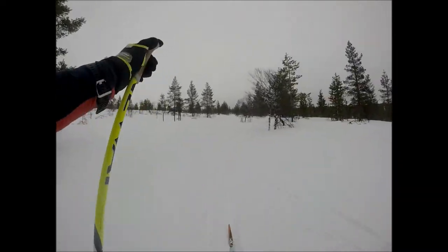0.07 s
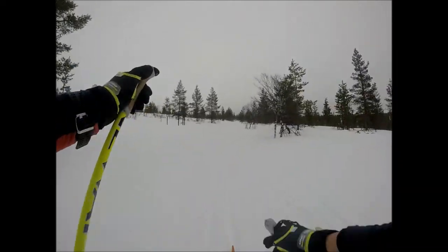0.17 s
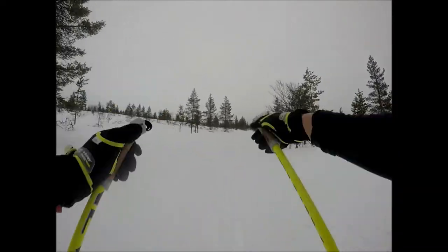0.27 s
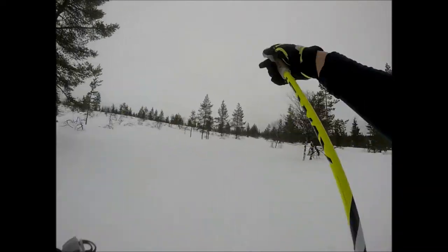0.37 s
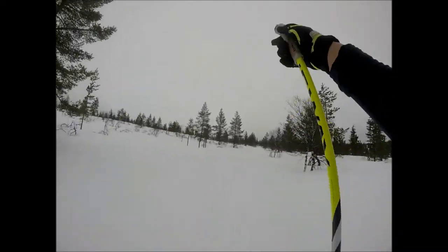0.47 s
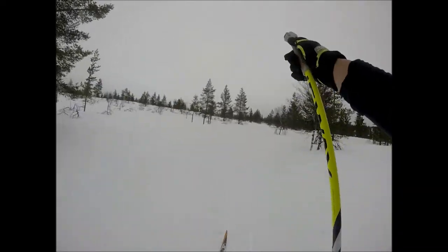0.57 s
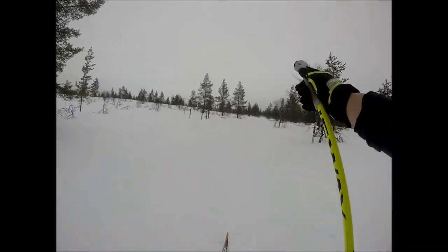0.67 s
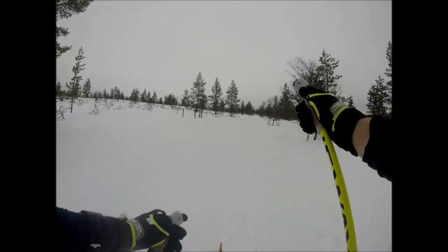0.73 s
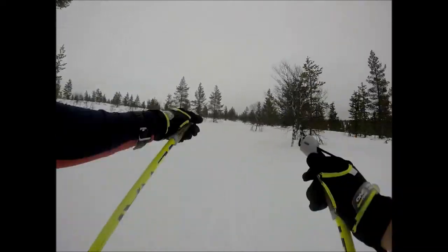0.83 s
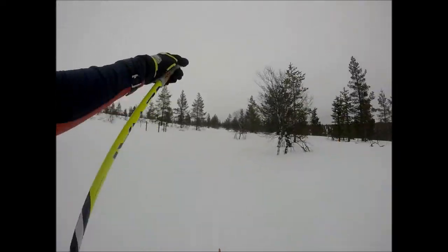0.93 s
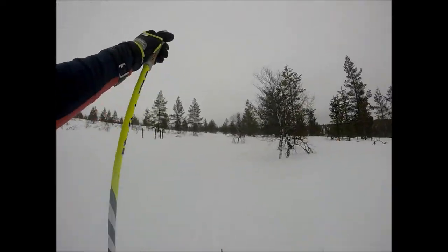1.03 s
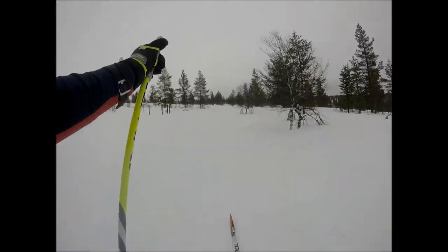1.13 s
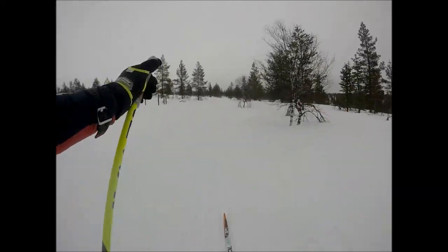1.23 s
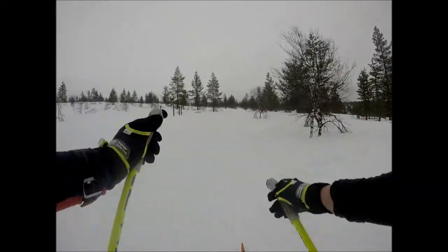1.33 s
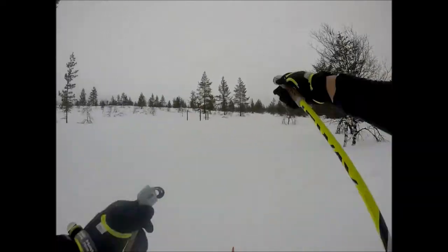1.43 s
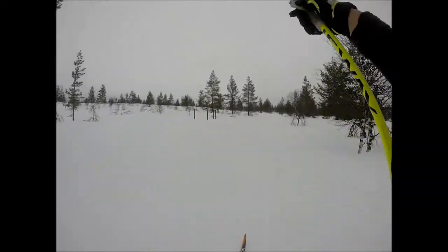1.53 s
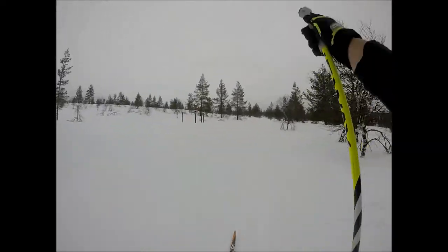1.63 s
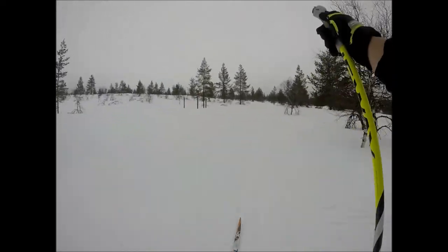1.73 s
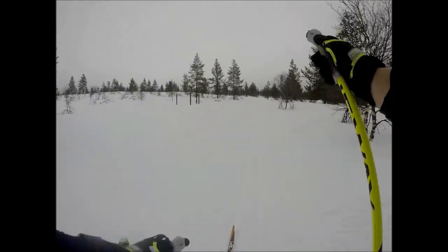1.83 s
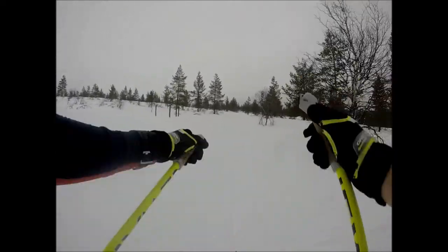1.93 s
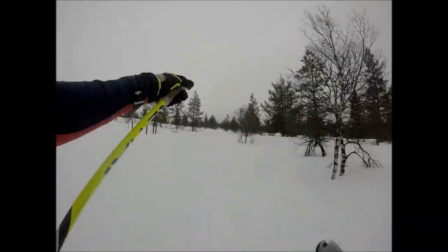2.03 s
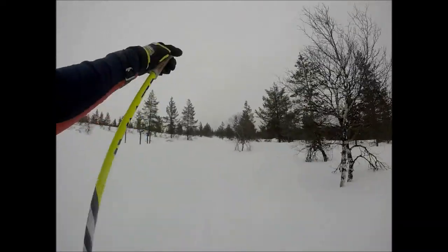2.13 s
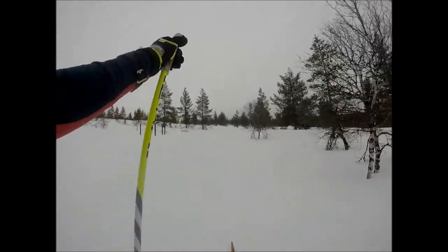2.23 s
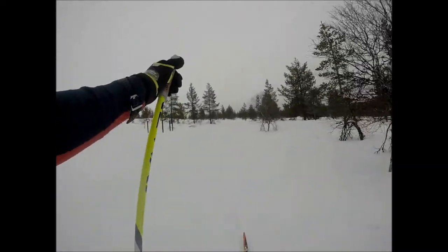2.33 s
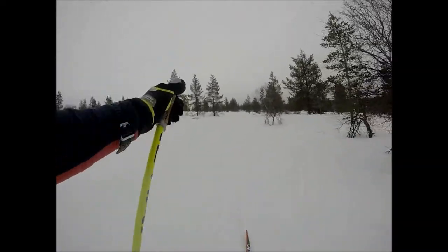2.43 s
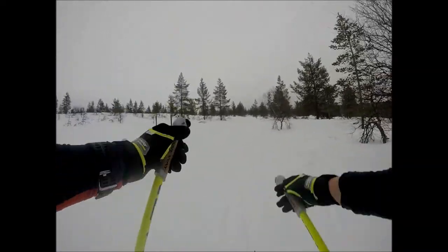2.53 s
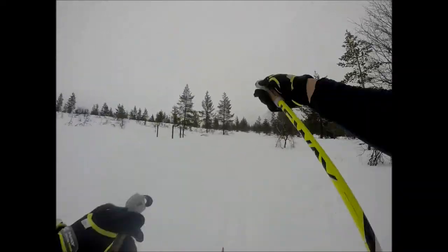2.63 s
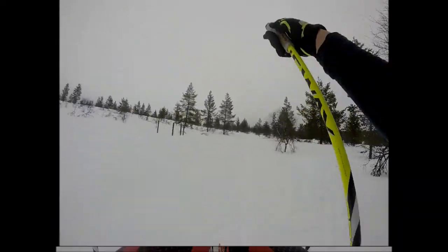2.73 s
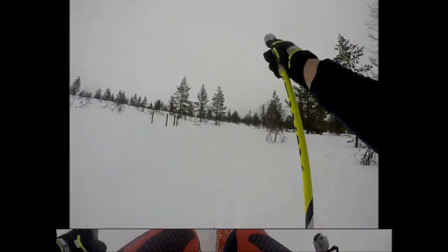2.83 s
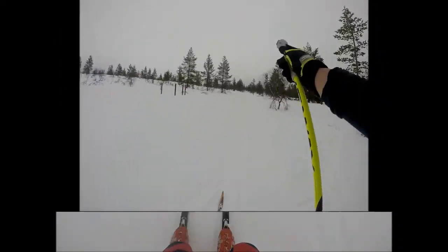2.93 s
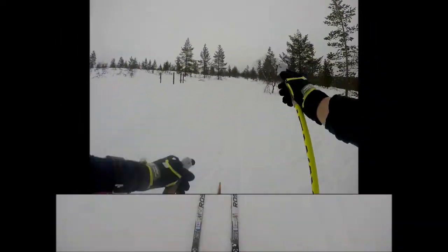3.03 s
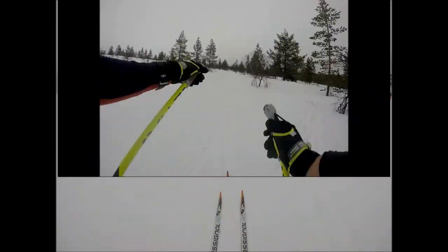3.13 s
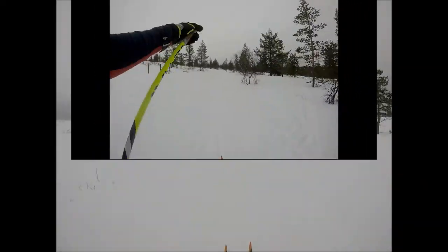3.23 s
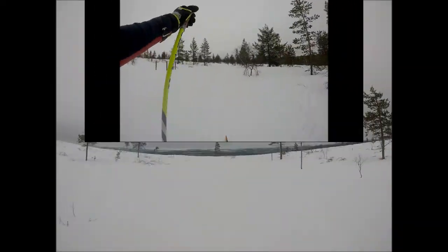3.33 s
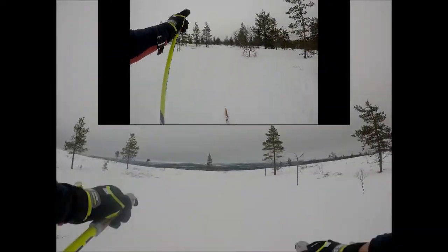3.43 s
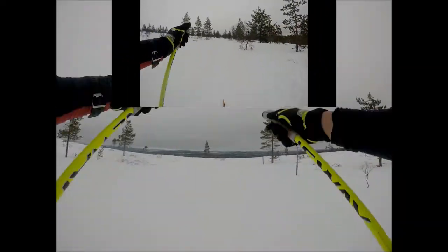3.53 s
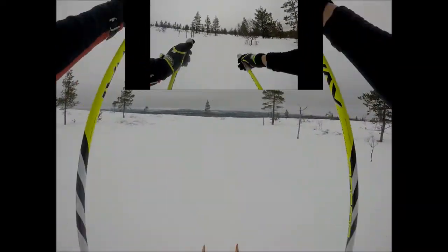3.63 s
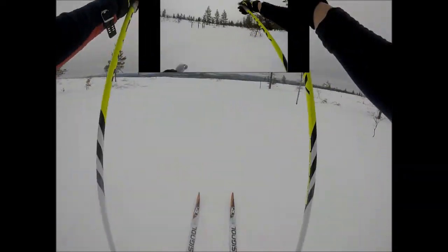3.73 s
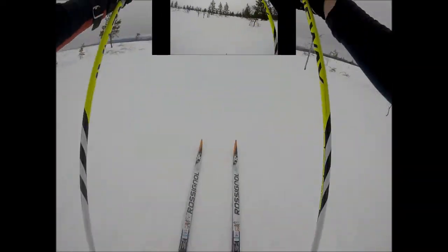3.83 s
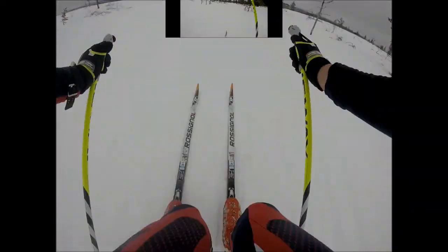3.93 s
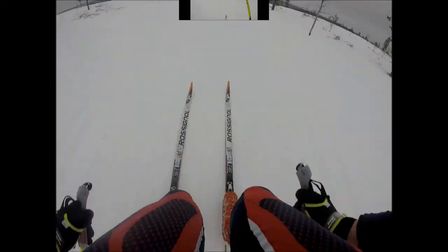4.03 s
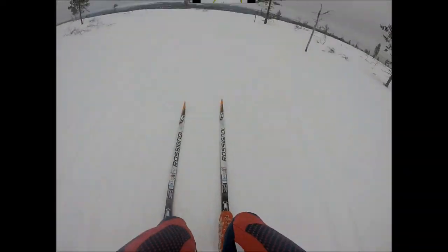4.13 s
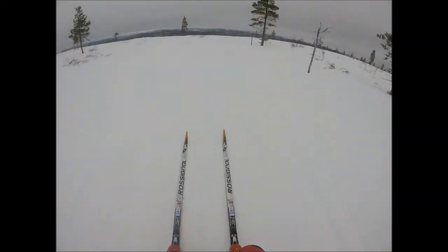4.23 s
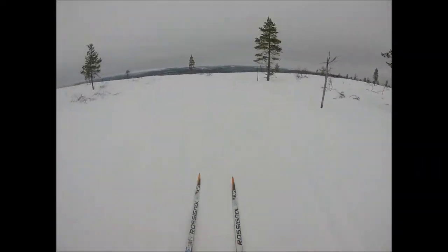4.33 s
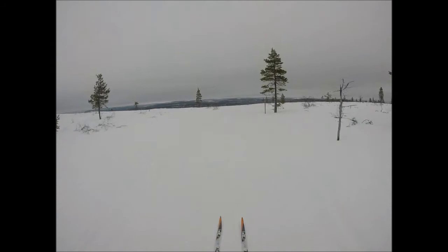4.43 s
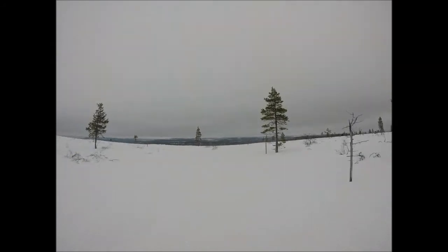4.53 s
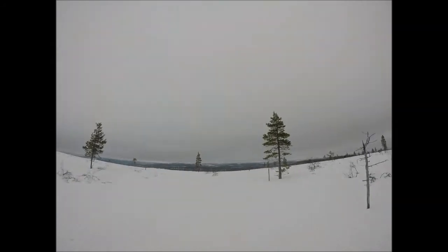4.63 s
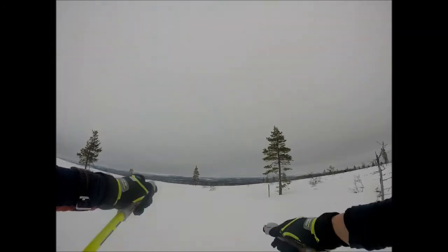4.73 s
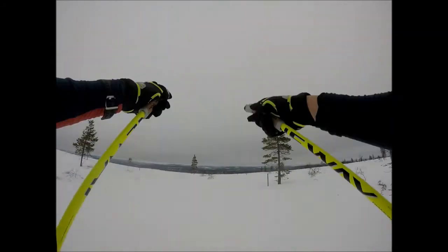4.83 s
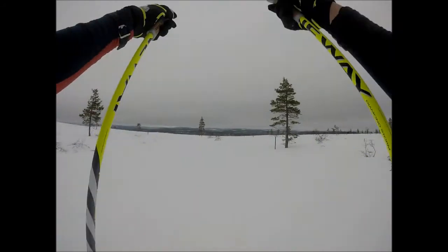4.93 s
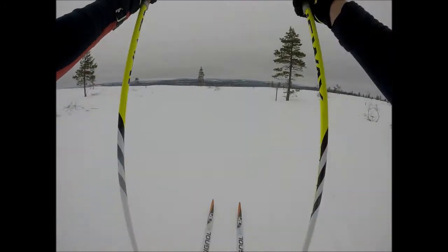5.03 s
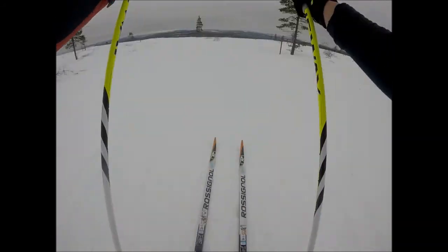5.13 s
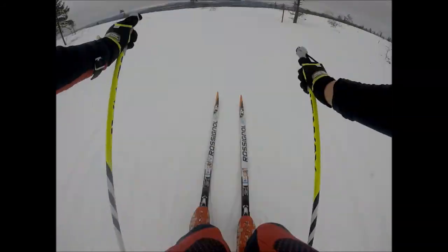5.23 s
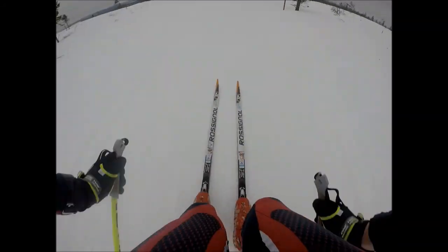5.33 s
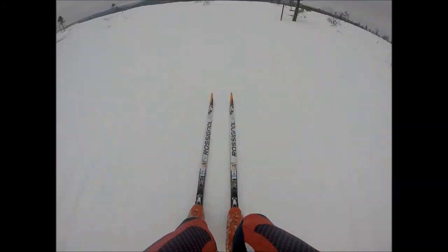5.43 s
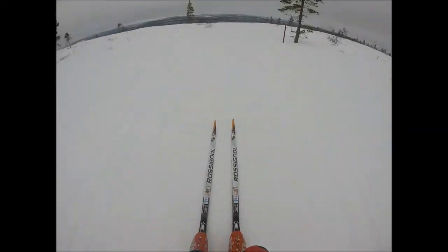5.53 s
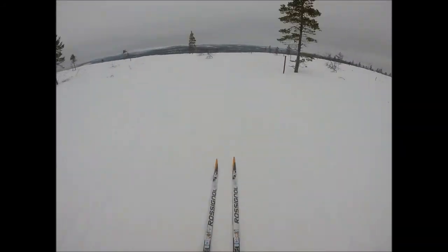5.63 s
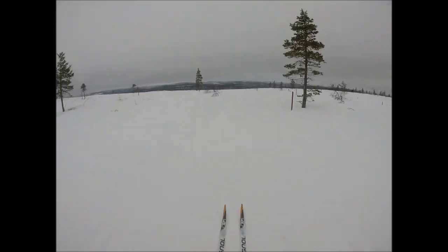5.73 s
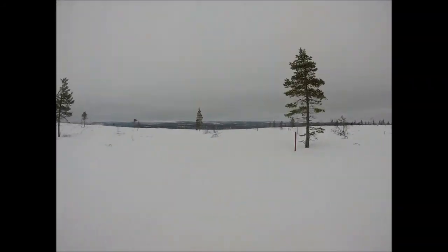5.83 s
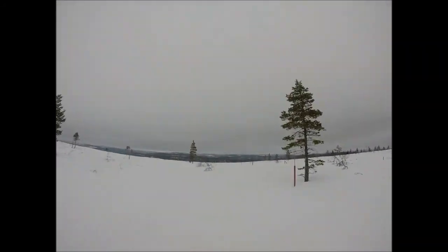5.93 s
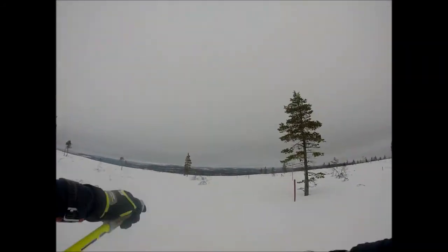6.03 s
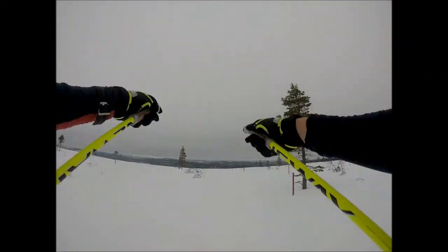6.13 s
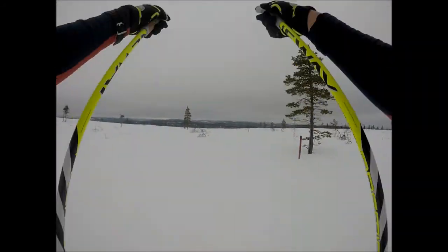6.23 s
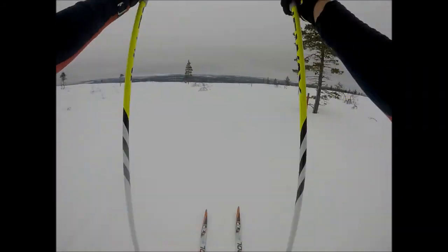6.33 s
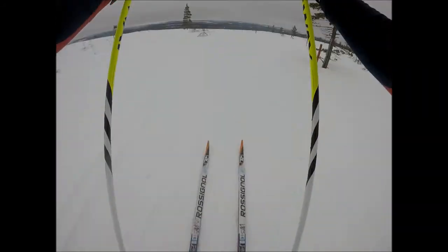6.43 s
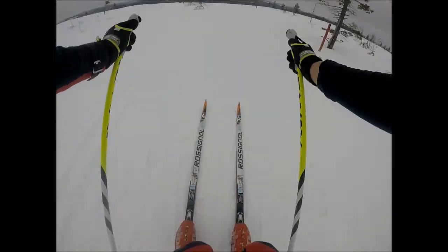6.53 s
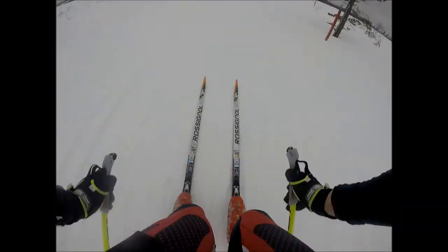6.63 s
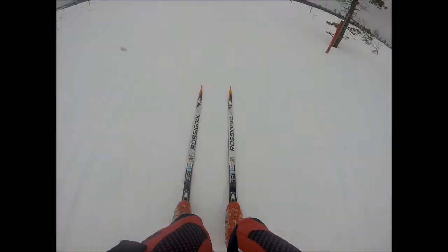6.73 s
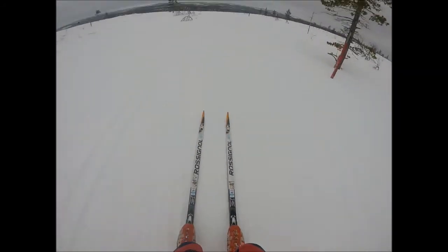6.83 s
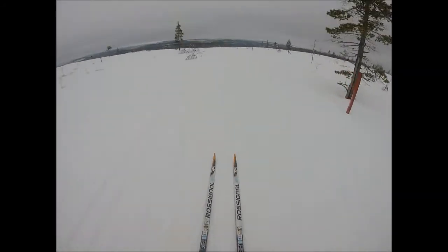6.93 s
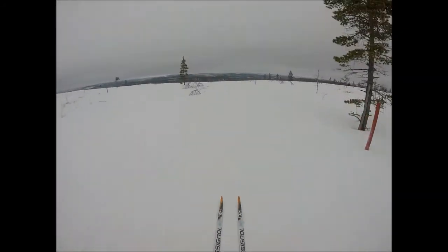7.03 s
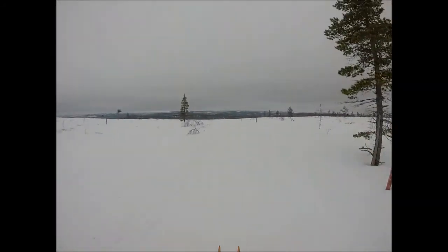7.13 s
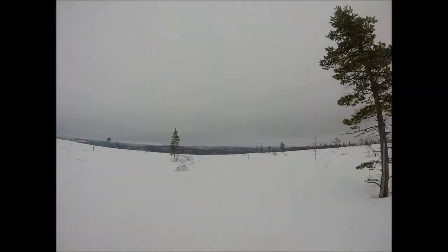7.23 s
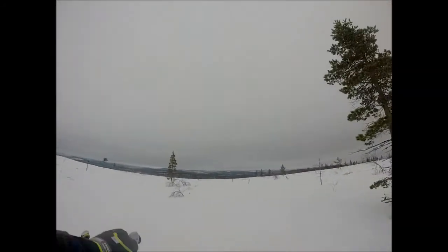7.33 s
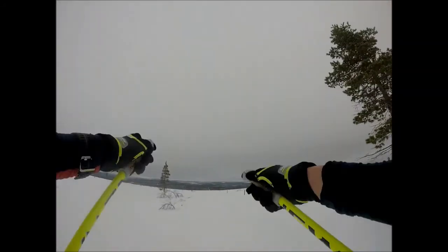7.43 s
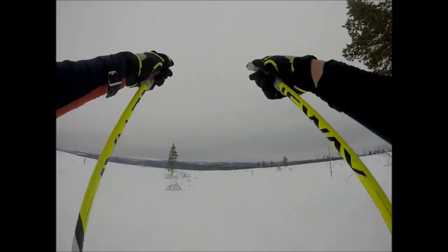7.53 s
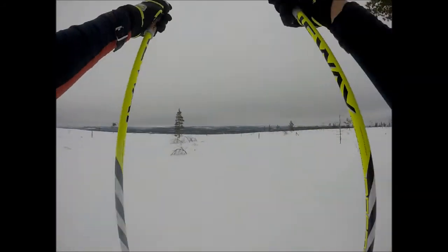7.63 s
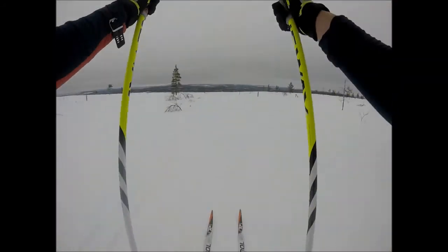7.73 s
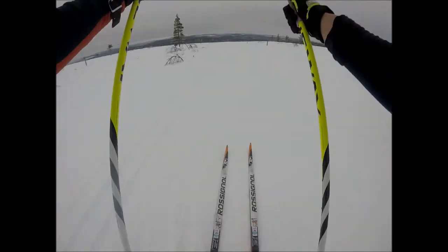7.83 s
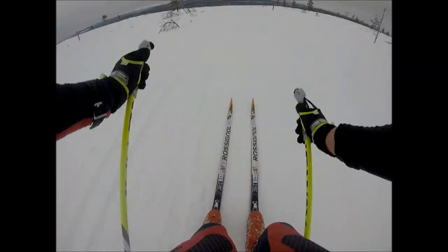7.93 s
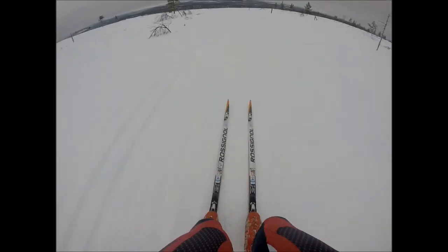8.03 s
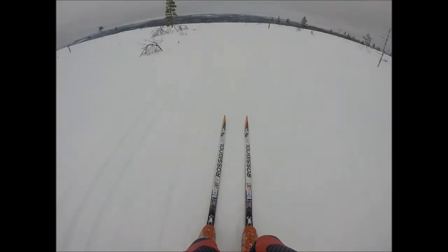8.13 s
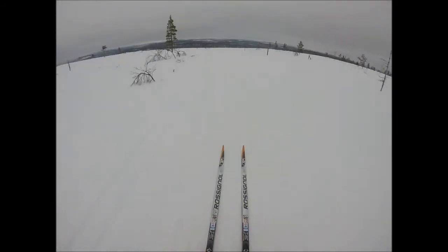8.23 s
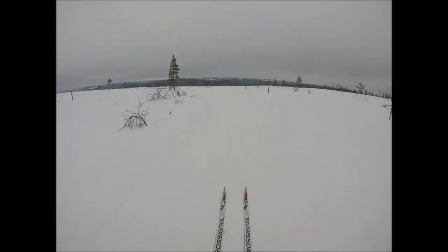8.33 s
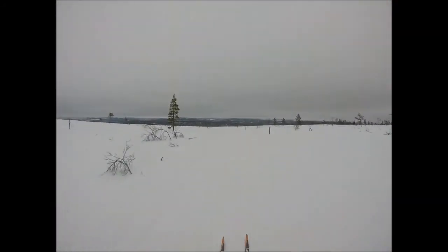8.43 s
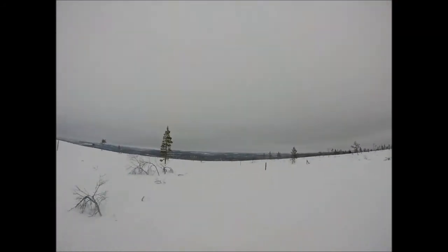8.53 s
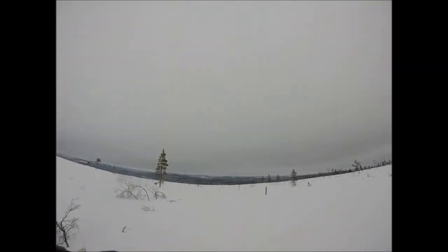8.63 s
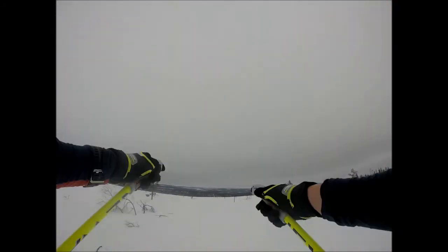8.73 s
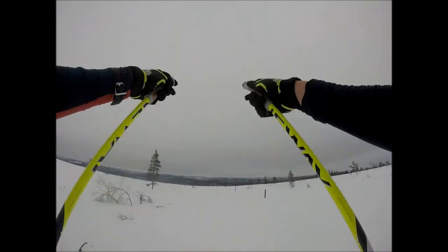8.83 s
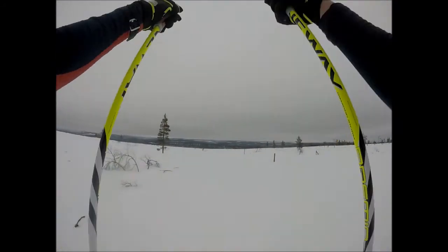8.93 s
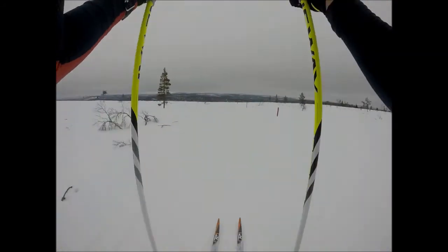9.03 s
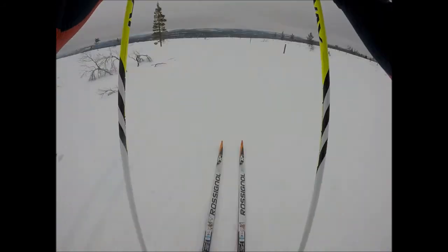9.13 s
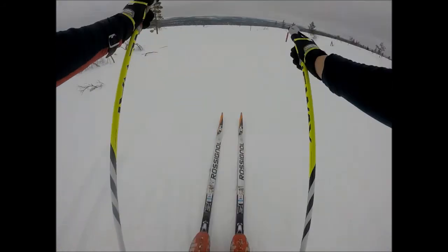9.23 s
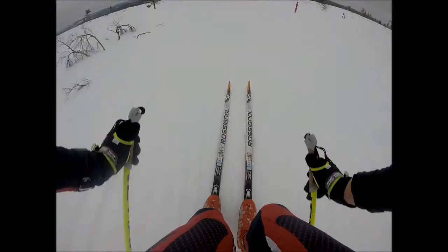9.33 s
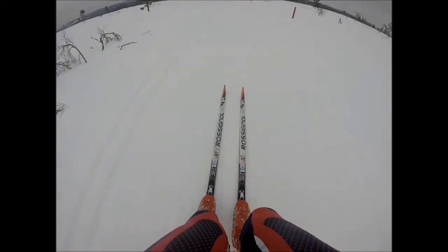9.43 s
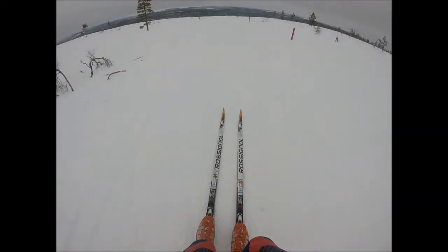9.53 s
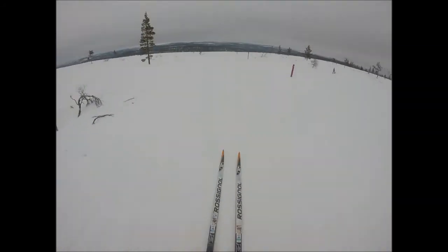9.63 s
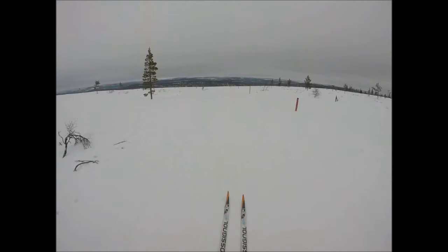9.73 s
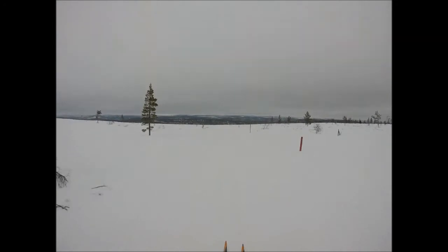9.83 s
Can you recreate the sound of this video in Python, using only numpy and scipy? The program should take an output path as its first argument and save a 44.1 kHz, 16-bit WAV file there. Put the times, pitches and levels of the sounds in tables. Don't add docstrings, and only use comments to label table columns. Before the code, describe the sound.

Close, boxy body-worn sound of cross-country skiing: rhythmic pole crunches and heavy low thumps, sharp plastic clacks, creaking straps, soft snow hiss.

```python
import sys
import numpy as np
from scipy import signal
from scipy.fft import rfft, irfft, next_fast_len
from scipy.io import wavfile
from scipy.ndimage import uniform_filter1d, map_coordinates

SR = 44100
rng = np.random.default_rng(int(sys.argv[2]) if len(sys.argv) > 2 else 0)


def unload_wav(signal):
    wavfile.write(
        sys.argv[1],
        SR,
        np.round(np.clip(np.atleast_2d(signal).T, -1, 1) * 32767).astype(np.int16),
    )


def magnitude_from_level(level_db):
    exponent = np.asarray(level_db, float) / 20
    return 10 ** exponent


N = 436149

# (time [s], force [dB], contact [s], slap against the case [gain], recoil share [gain])
JOLTS = [
    (0.5819, 21.9, 0.0067, 0.04, -0.91),
    (1.7102, 25.3, 0.0046, -0.44, -0.48),
    (2.7276, 25.0, 0.0052, -0.57, -0.82),
    (2.9231, 25.3, 0.006, -0.18, -0.35),
    (3.986, 32.5, 0.0068, -0.82, -0.51),
    (5.3101, 25.6, 0.0049, -0.36, -0.64),
    (6.5947, 26.3, 0.0052, -0.54, -0.43),
    (7.9365, 21.2, 0.0069, 0.03, -0.39),
    (9.3116, 25.7, 0.0049, -0.6, -0.4),
]
# (frequency [Hz], width [Hz])
CAVITY = [(1440, 214), (2320, 720), (3080, 410), (5150, 1100)]


def unit(x):
    return x / np.sqrt(np.mean(x ** 2) + 1e-20)


def peak(x):
    return x / np.abs(x).max()


def curve(rows):
    return np.interp(np.arange(N) / SR, *np.transpose(rows))


def wobble(rate):
    return map_coordinates(rng.standard_normal(int(N * rate / SR) + 4), [np.arange(N) * rate / SR])


def filtered(x, response):
    m = next_fast_len(len(x) + 8192)
    return irfft(rfft(x, m) * response(np.fft.rfftfreq(m, 1 / SR)), m)[:len(x)]


def mode(f, hz, width):
    return 1j * f * width / (hz * hz - f * f + 1j * f * width)


def modes(f, rows, gains):
    return sum((-1) ** k * g * magnitude_from_level(db) * mode(f, hz, width) for k, ((hz, width, db), g) in enumerate(zip(rows, gains)))


def add(track, s, x):
    part = track[..., round(s * SR):][..., :x.shape[-1]]
    part += x[..., :part.shape[-1]]


def grit(rough_db, rate):
    return unit(rng.standard_normal(N) * magnitude_from_level(rough_db * wobble(rate)))


def rush(spectrum, patchy_db, source):
    z = signal.stft(source, nperseg=512)[2]
    field = uniform_filter1d(rng.standard_normal(z.shape), size=8, axis=0)
    field = uniform_filter1d(field, size=10, axis=1)
    x = signal.istft(z * magnitude_from_level(patchy_db * unit(field)), nperseg=512)[1][:N]
    hz, db = np.transpose(spectrum)
    return unit(filtered(x, lambda f: magnitude_from_level(np.interp(np.log(f + 1), np.log(hz), db, -120, -120))))


def push(t, contact):
    u = np.clip(t, 0, None) / contact
    return u ** 3 * np.exp(3 - 3 * u)


def thuds():
    out, t = np.zeros(N), np.arange(SR // 5) / SR
    for s, db, contact, slap, recoil in JOLTS:
        hz = 81 + 8 * 1000 * (contact - .005)
        force = push(t, contact) + recoil * push(t - .0089, .0127)
        body = filtered(force, lambda f: mode(f, hz, 52.6) * mode(f, 199, 52) + .015 * mode(f, 47, 71))
        edge = filtered(push(t - .0006, .0006), lambda f: mode(f, 211, 162) ** 2 + 0.01 * mode(f, 650, 500))
        add(out, s, magnitude_from_level(db + .5) * body + slap * edge)
    return out


def shoves():
    # (time [s], peak [dB], swing [Hz])
    shove_rows = [(0.182, -29, 27), (0.811, -28, 45.2), (1.145, -29, 33.7), (1.447, -39, 33.6),
                  (2.09, -28.5, 29.3), (2.405, -31.5, 26.8), (3.688, -24.5, 40), (4.352, -32, 27.4),
                  (4.675, -34, 35.5), (5.656, -32, 29.6), (5.96, -41, 64), (6.305, -23.5, 48.7),
                  (7.603, -26.5, 40.5), (8.893, -25, 32.7), (3.093, -29, 55.4), (3.375, -26.5, 60.4),
                  (4.067, -22, 123), (4.273, -31, 75), (4.813, -31, 30), (5.459, -35, 60),
                  (6.951, -35.5, 34.5), (7.284, -30, 50.4), (8.16, -28, 131), (8.246, -29.5, 35),
                  (9.369, -30, 61), (9.614, -28.5, 88.5), (4.469, -39, 64), (5.869, -37, 100),
                  (7.099, -37, 69.5), (6.03, -38, 29.8), (6.21, -36, 30), (8.56, -32, 70), (7.2, -35, 150),
                  (2.1, -43, 120)]
    out, t = np.zeros(N), np.arange(SR // 5) / SR
    for s, db, hz in shove_rows:
        swing = filtered(push(t, 0.18 / hz), lambda f: mode(f, hz, 0.82 * hz) ** 2)
        add(out, s, -magnitude_from_level(db) * peak(swing))
    return out


def knocks():
    # (time [s], peak [dB], low knock
    # [dB], treble [dB])
    knock_rows = [(2.9865, -15.5, -36, -4), (3.8345, -5, -28, -18.5), (4.1318, -21.5, -21, -27),
                  (4.5932, -31.5, -18.5, -42), (5.1588, -8.5, -25.5, -23), (5.4736, -26.5, -21, -98),
                  (5.778, -32, -19, -6), (5.889, -29.5, -21.5, -20), (6.4495, -8, -26, -42),
                  (6.805, -14, -31.5, -31), (7.1616, -32, -48, -20), (7.188, -30.5, -18.5, -19),
                  (7.8282, -8.5, -25, -27), (8.0415, -29, -26, -21), (8.2113, -14, -27.5, -20),
                  (8.5098, -29.5, -18, -22), (9.1621, -8.5, -25, -57), (9.472, -16, -23, -16),
                  (9.601, -35, -17, -31)]
    # (frequency [Hz], width [Hz], level [dB])
    buckle = [(580, 270, -10.5), (1050, 134, -2.5), (1290, 160, -4), (1720, 240, -0.5), (2250, 300, 1.5),
              (2800, 980, -3), (3770, 414, -11.5)]
    out, t = np.zeros(N), np.arange(SR // 10) / SR
    kick = peak(filtered(push(t, 0.00046), lambda f: mode(f, 286, 140) * mode(f, 330, 1200)
                         + 2.4 * mode(f, 132.5, 39.0)))
    rattle = magnitude_from_level(-26 - 60 * t / 0.07) * (t > .0012)
    scuff = magnitude_from_level([[-15], [0]]) * push(t, 0.0016)
    for s, db, low_db, treble_db in knock_rows:
        noise = rng.standard_normal((2, len(t))) * (scuff + rattle)
        noise[0] += push(t - .0006, .00006)
        noise[0] += 0.28 * push(t - 0.00313, .0001)
        tilt = magnitude_from_level(rng.normal(0, 1.35, len(buckle)))
        crack = filtered(noise[0], lambda f: modes(f, buckle, tilt) * mode(f, 1800, 3100) ** 2
                         / (1 + 1j * f / 4200) ** 2)
        top = filtered(noise[1], lambda f: mode(f, 4130, 1700) ** 2 * mode(f, 6400, 5000))
        hit = peak(crack) + magnitude_from_level(treble_db) * peak(top) + magnitude_from_level(low_db + 18.0) * kick
        add(out, s - .001, magnitude_from_level(db - 2.0) * hit)
    return out


def rustle():
    drive = creaks() + plants() + ticks()
    drive *= unit(magnitude_from_level(2.5 * np.tanh(wobble(380))))
    hiss_db, spray_db, _ = effort()
    drive += magnitude_from_level([hiss_db - 10.5] * 3 + [spray_db - 10.5] * 2) * crackle(rate=88, spread_db=3.5)
    out = np.zeros(N)
    for force, ring in zip(drive, [cavity_ring(hz, width) for hz, width in CAVITY] + [shell_ring]):
        grain = grit(rough_db=3.5, rate=400)
        out += filtered(force * grain, ring) / np.std(filtered(grain, ring))
    return out


def creaks():
    # (time [s], level [dB], centre [Hz], t60 [s])
    bite_rows = [(.003, -25.5, 2350, 0.12), (0.537, -29, 2800, 0.065), (1.092, -26.5, 2170, 0.086),
                 (1.104, -24, 2100, 0.034), (1.643, -21, 3000, 0.028), (2.267, -23.5, 2290, 0.04),
                 (2.288, -44, 2290, 0.12), (3.05, -40, 2410, 0.046), (3.892, -27, 2330, 0.043),
                 (3.918, -20, 2250, 0.055), (4.059, -31.5, 2000, 0.06), (4.066, -28, 1900, .05),
                 (4.48, -32, 1846, 0.07), (5.085, -25, 2860, 0.05), (5.247, -18, 2080, 0.044),
                 (5.069, -42, 3050, 0.03), (1.138, -37, 2330, .04), (5.685, -41, 2400, 0.02),
                 (5.808, -35.5, 1950, 0.028), (6.38, -29.5, 2570, 0.042), (6.548, -17.5, 2396, 0.028),
                 (7.749, -36, 2680, .04), (7.753, -32.5, 2900, .04), (7.857, -33, 2130, 0.079),
                 (7.893, -17, 2080, 0.032), (9.092, -24.5, 2690, 0.084), (9.226, -32.5, 2165, 0.046),
                 (9.312, -28, 2190, 0.081)]
    # (time [s], level [dB], centre [Hz], t60 [s])
    snap_rows = [(.703, -36, 1900, 0.076), (1.367, -36, 2000, 0.081), (3.101, -32, 2130, 0.047),
                 (3.288, -26.5, 1920, 0.06), (3.35, -40.5, 1900, 0.036), (3.44, -37, 2180, 0.09),
                 (4.283, -24.5, 1600, .045), (4.86, -41, 2300, .04), (5.263, -37, 2000, 0.027),
                 (5.5, -31, 2000, 0.027), (6.3, -28, 1800, 0.019), (6.617, -28.5, 2200, 0.034),
                 (6.66, -32, 2000, .04), (8.012, -39, 1600, 0.035), (2.981, -24, 2000, 0.037),
                 (5.47, -34, 1500, 0.044), (3.268, -39, 2600, 0.023), (3.3, -33, 1400, .04),
                 (3.834, -29, 2200, 0.037), (8.55, -40, 1600, .04), (9.374, -32, 1900, 0.027),
                 (5.193, -24.5, 2100, 0.035), (5.331, -23, 2100, 0.031), (5.838, -27.5, 1820, 0.047),
                 (5.864, -36, 2500, 0.017), (6.7, -21, 2200, 0.021), (6.61, -28, 1610, 0.056),
                 (6.643, -31, 1800, 0.015), (6.681, -23.5, 2000, 0.017), (7.992, -24.5, 2060, 0.033),
                 (8.155, -31.5, 1660, 0.033), (8.039, -29.5, 1500, 0.021), (7.95, -33.5, 2030, .1),
                 (4.2, -39, 2000, 0.036), (8.455, -31.5, 1700, 0.069), (8.468, -32, 2400, 0.017),
                 (8.571, -34, 1960, .026), (9.285, -32, 1960, 0.016), (6.914, -32.5, 2000, 0.042),
                 (8, -32, 2600, 0.027), (7.269, -39, 1700, .025), (1.9, -37, 1500, .03),
                 (9.803, -39.5, 1800, 0.018), (9.833, -28, 1800, 0.025), (9.871, -27, 1800, 0.025)]
    # (time [s], level [dB], centre [Hz], t60 [s])
    spark_rows = [
        (1.292, -46, 2390, 0.018),
        (2.106, -40, 2070, 0.047),
        (3.944, -33, 2800, 0.038),
        (4.24, -38, 2500, 0.028),
        (6.416, -40, 3000, .012),
        (6.576, -24, 2180, 0.012),
        (7.877, -27, 2250, 0.05),
        (7.888, -26.5, 2900, .015),
    ]
    # (time [s], level [dB], centre [Hz], t60 [s], treble [dB])
    rub_rows = [(.39, -47, 1840, 0.27, -29), (.667, -46, 1930, 0.13, -19), (.83, -50, 2460, 0.068, 11),
                (1.017, -46, 2100, 0.16, 4), (1.304, -47, 2260, .092, 6), (1.59, -44.5, 2450, 0.33, -98),
                (2.299, -49.5, 2400, 0.25, 4), (2.849, -35.5, 3200, 0.25, -2),
                (3.137, -37.5, 1750, 0.17, -24), (3.33, -41.5, 2090, 0.089, -2),
                (3.4, -30, 2300, 0.033, -11), (5.226, -39, 2000, 0.065, -25), (6.52, -36, 1800, 0.043, -25),
                (7.845, -35, 2200, .04, -4), (5.07, -46, 2820, 0.17, 6), (6.538, -31.5, 2470, 0.06, -0.5),
                (6.93, -43, 1950, 0.32, -20), (7.3, -48.5, 2800, .2, -20), (7.38, -51, 2730, 0.45, -20),
                (7.102, -39, 1900, 0.027, -36), (8.015, -42, 1740, 0.24, -22),
                (9.245, -38, 2160, 0.11, -12), (9.354, -34.5, 1800, 0.069, -27),
                (9.798, -34.5, 1780, 0.15, -20)]
    treble_fades = np.array([[1], [1], [1], [1.3], [1.7]])
    bursts = [(*row, -12, 0.0016) for row in bite_rows]
    bursts += [(*row, -30, 0.0017) for row in snap_rows]
    bursts += [(*row, 0, 0.0017) for row in spark_rows]
    bursts += [(*row, 0.013) for row in rub_rows]
    drive, t = np.zeros((5, N)), np.arange(SR // 4) / SR
    for s, db, hz, t60, treble_db, rise in bursts:
        shape = np.minimum(t / rise, 1) * magnitude_from_level(-60 * np.maximum(t - rise, 0) / t60)
        add(drive, s, magnitude_from_level(db) * shares(hz, treble_db - 8, treble_db - 6) * shape ** treble_fades)
    return drive


def plants():
    # (time [s], length [s], level [dB], centre [Hz], basket ring [dB])
    plant_rows = [(0.524, 0.073, -41, 2850, -12), (0.659, 0.034, -48, 1720, -16),
                  (0.809, 0.057, -45, 2350, -6), (1.097, 0.062, -41, 2100, -5.5),
                  (1.306, 0.037, -47.5, 2290, 1), (1.354, 0.039, -44.5, 2000, -10),
                  (1.642, 0.026, -35, 2870, -8), (2.275, 0.0025, -32, 2400, -0.5),
                  (2.381, 0.041, -44.5, 1900, -9), (2.708, 0.16, -42, 2090, -9.5),
                  (3.388, 0.047, -36, 2300, -7), (3.749, 0.024, -33, 2640, -11.5),
                  (3.91, 0.058, -36.5, 2880, -8), (4.339, 0.055, -44.5, 1950, -8),
                  (4.715, 0.024, -44.5, 2280, -36), (4.879, 0.063, -52, 2060, -15),
                  (5.637, 0.058, -49, 2370, -11), (8.752, 0.19, -51, 2440, -49),
                  (9.645, 0.065, -46, 2270, -11), (5.079, 0.031, -42.5, 2980, -5),
                  (5.997, 0.031, -49, 2500, -17), (6.125, .11, -51.5, 2480, -20),
                  (8.615, .07, -53, 2300, -23), (6.371, 0.018, -33, 2740, -8), (7.76, 0.013, -36, 2700, -7),
                  (8.249, 0.067, -45, 2100, -12), (9.086, 0.036, -49.5, 2850, 4)]
    drive, t = np.zeros((5, N)), np.arange(SR // 4) / SR
    for s, length, db, hz, ring_db in plant_rows:
        lift = (length - t) / 0.015 + 1
        shape = np.clip(np.minimum(t / 0.0069, lift), 0, 1)
        add(drive, s, magnitude_from_level(db) * shares(hz, ring_db, treble_db=-12.5) * shape)
    return drive


def ticks():
    # (time [s], peak [dB], centre [Hz])
    tick_rows = [(2.395, -48, 1490), (4.6087, -22.5, 1450), (4.664, -28, 3110), (5.3844, -64, 1520),
                 (5.5912, -62, 1630), (5.6652, -34, 2560), (6.489, -25, 2330), (7.11, -25, 1530),
                 (8.0794, -27, 3190), (8.1344, -47, 1560), (9.4389, -37, 1620), (9.512, -23, 1429)]
    drive, t = np.zeros((5, N)), np.arange(SR // 4) / SR
    for s, db, hz in tick_rows:
        add(drive, s, magnitude_from_level(db - 17.0 - 60 * t / 0.07) * shares(hz, ring_db=-10.0, treble_db=-11))
    return drive


def shares(hz, ring_db, treble_db):
    low_hz = np.transpose(CAVITY)[0][:3]
    low = unit(np.exp(-((low_hz - hz) / 600) ** 2)) / np.sqrt(3)
    return np.append(low, magnitude_from_level([ring_db, treble_db]))[:, None]


def crackle(rate, spread_db):
    sparks = (rng.random(N) < rate / SR) * magnitude_from_level(spread_db * np.minimum(rng.exponential(size=N), 3))
    return np.convolve(sparks, magnitude_from_level(-60 * np.arange(SR // 50) / SR / 0.0068))[:N]


def cavity_ring(hz, width):
    dull_hz = max(4540, 1.04 * hz)
    return lambda f: mode(f, hz, width) * mode(f, hz, 4 * width) / (1 + 1j * f / dull_hz) ** 2


def shell_ring(f):
    # (frequency [Hz], width [Hz], level [dB])
    upper_modes = [(7060, 2170, 9.5), (11700, 6700, -0.5)]
    return modes(f, upper_modes, np.ones(len(upper_modes))) ** 2


def skis():
    # (frequency [Hz], density [dB per Hz])
    hiss_spectrum = [(350, -12), (600, -9.5), (673, -7.5), (869, -11.5), (936, -3.5), (1110, -8.5),
                     (1220, -1.5), (1330, -1), (1610, 1.5), (1980, -6), (2560, 0), (3300, -4.5),
                     (3650, -10.5), (4060, -33), (4300, -7), (5590, -23), (9460, -120)]
    # (frequency [Hz], density [dB per Hz])
    spray_spectrum = [(2240, -19.5), (3800, -2.5), (4130, -8.5), (5010, -5.5), (5390, -9.5), (6300, -7.5),
                      (7870, -4.5), (9040, -15.5), (11000, -13), (12700, -21), (14000, -18.5), (15600, -30),
                      (16000, -60)]
    hiss_db, spray_db, _ = effort()
    flutter_db = 1.01 * wobble(14) + 2.2 * wobble(45)
    hiss = rush(hiss_spectrum, patchy_db=2.6, source=grit(rough_db=2, rate=300))
    spray = rush(spray_spectrum, patchy_db=1.9, source=grit(rough_db=1.2, rate=400))
    return magnitude_from_level(hiss_db + flutter_db) * hiss + magnitude_from_level(spray_db + 0.67 * flutter_db) * spray


def effort():
    # (time [s], hiss [dB])
    load = [(0.0, -44.5), (0.25, -52.5), (0.66, -49.5), (2.75, -51.5), (2.92, -44.5), (3.75, -48),
            (3.96, -43), (4.41, -52), (4.93, -53), (5.21, -45.5), (6.14, -53.5), (6.64, -45), (7.19, -51),
            (7.74, -53.5), (7.99, -44), (8.35, -50.5), (8.87, -51.5), (9.89, -48.5)]
    lead_s, rise_s, fade_s = 0.2, 0.38, 0.81
    hiss_db = curve(load)
    jolt_s = np.transpose(JOLTS)[0][:, None]
    since = np.clip(np.arange(N) / SR + lead_s - jolt_s, 0, None)
    share = np.where(jolt_s < 2.5, 0.14, 1)
    shake = (share * np.minimum(since / rise_s, 1) * np.exp(-(since / fade_s) ** 2)).max(axis=0)
    spray_db = -54 + 0.65 * (hiss_db - hiss_db.mean()) + 3 * shake
    return hiss_db, spray_db, -54.5 + 12 * shake


def sway():
    # (frequency [Hz], density [dB per Hz])
    rumble_spectrum = [(35, -64), (60, 0), (90, -0.5), (180, -8.5), (320, -20), (700, -36), (1200, -49)]
    rumble_db = effort()[-1] + 3.8 * np.tanh(wobble(24))
    return magnitude_from_level(rumble_db) * rush(rumble_spectrum, patchy_db=1.0, source=rng.standard_normal(N))


def wind():
    # (time [s], gust on the port [dB])
    gusts = [(0.0, -41.5), (.5, -45.5), (1.05, -47), (1.5, -43), (2.42, -47), (2.92, -41), (3.39, -39.5),
             (3.88, -39), (4.55, -47.5), (5.4, -45), (5.62, -52), (6.1, -39.5), (6.67, -39), (7.05, -49),
             (8.21, -47), (9.12, -47.5), (9.36, -40), (9.89, -46)]
    # (frequency [Hz], density [dB per Hz])
    buffet_spectrum = [(8, 1.5), (20, 2), (40, -6), (70, -28), (150, -58)]
    buffet_db = curve(gusts) + 0.3 + 4.0 * np.tanh(wobble(15))
    return magnitude_from_level(buffet_db) * rush(buffet_spectrum, patchy_db=0, source=rng.standard_normal(N))


def case_air():
    # (frequency [Hz], density [dB per Hz])
    air_spectrum = [(200, -13), (300, 6), (600, -1), (1000, -7), (1500, 3.5), (2500, -40)]
    floor = rush(air_spectrum, patchy_db=3.0, source=grit(rough_db=4.5, rate=80))
    return magnitude_from_level(-66.5 + 6.44 * wobble(15)) * floor


def scene():
    impacts = thuds() + shoves() + knocks() + rustle()
    return (impacts + skis() + sway() + wind() + case_air())[None]


def top_cut(x):
    return signal.sosfilt(signal.butter(12, 16450, fs=SR, output="sos"), x)


def record(dry):
    clipped = np.clip(dry[0], -1, 1)
    mix = filtered(clipped, lambda f: f < 15550)[None]
    return top_cut(mix)


dry = scene()
out = record(dry)
unload_wav(out)
```